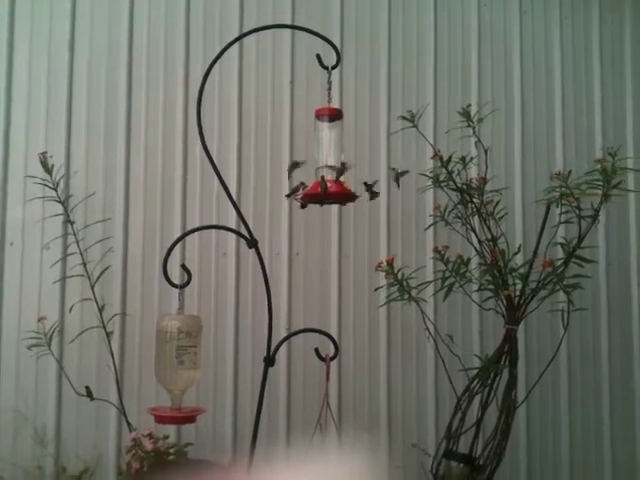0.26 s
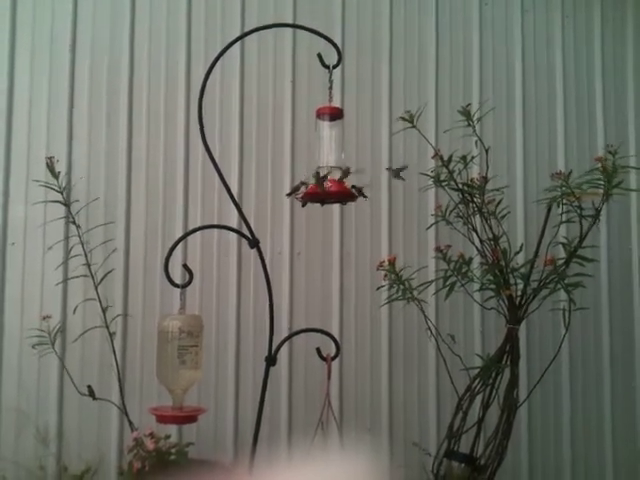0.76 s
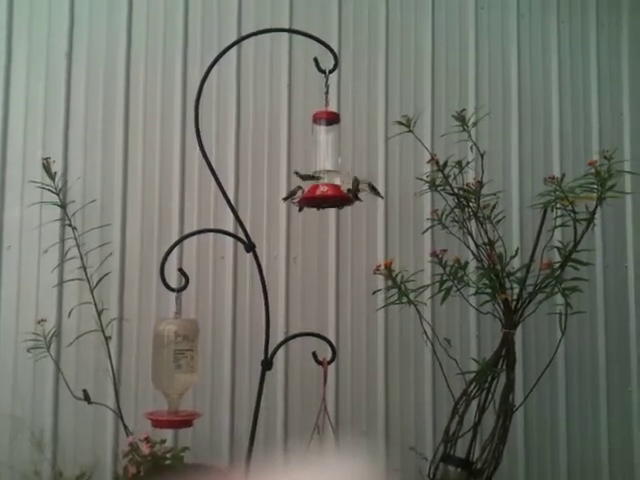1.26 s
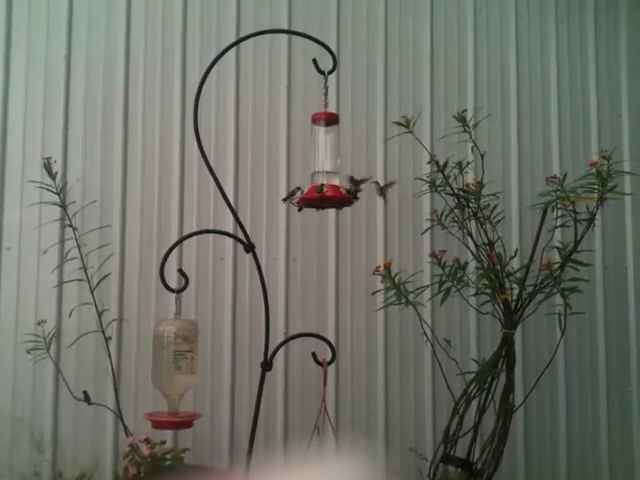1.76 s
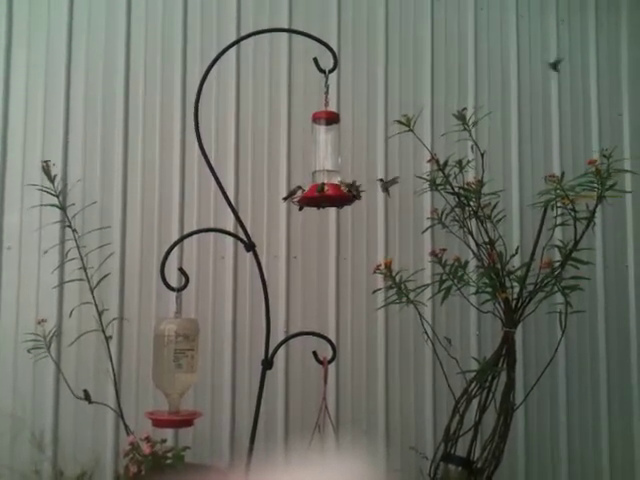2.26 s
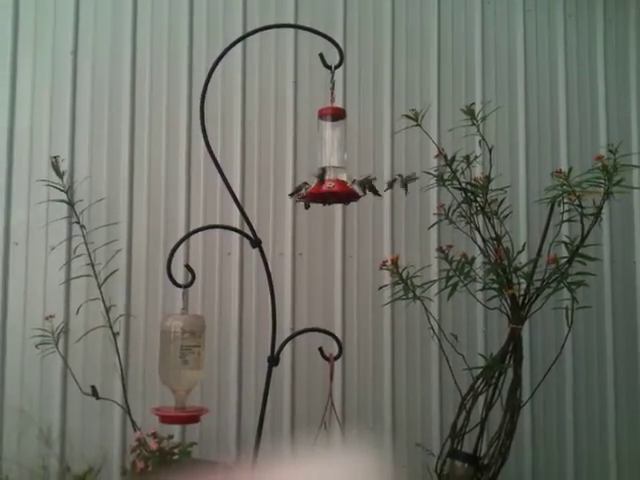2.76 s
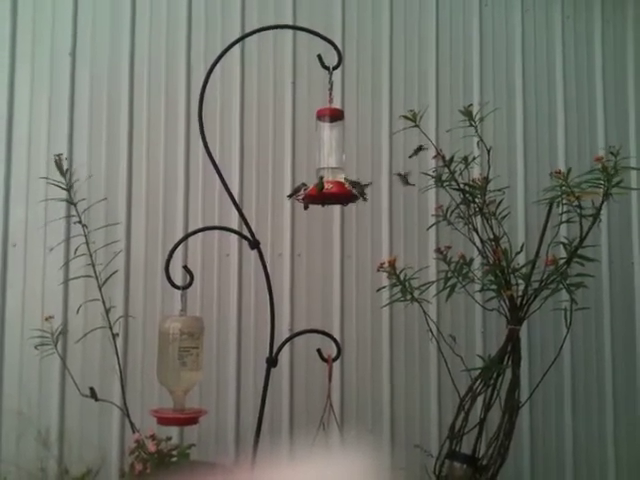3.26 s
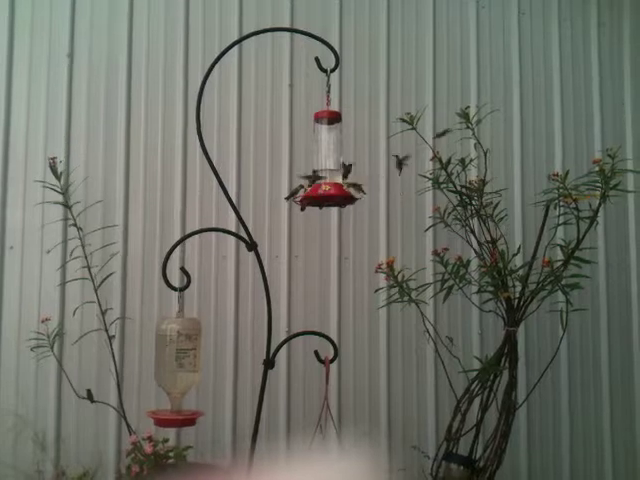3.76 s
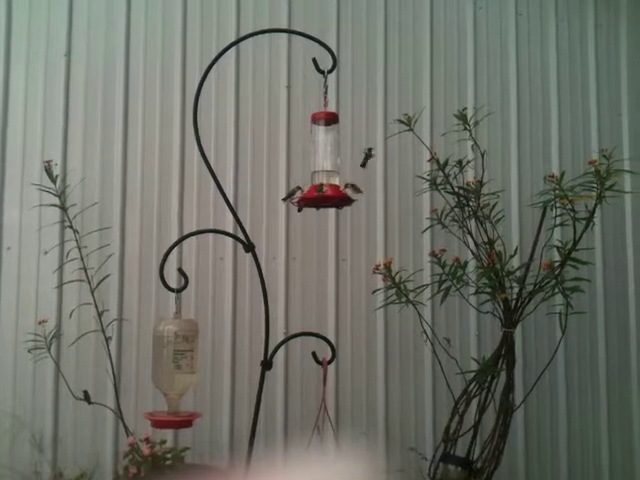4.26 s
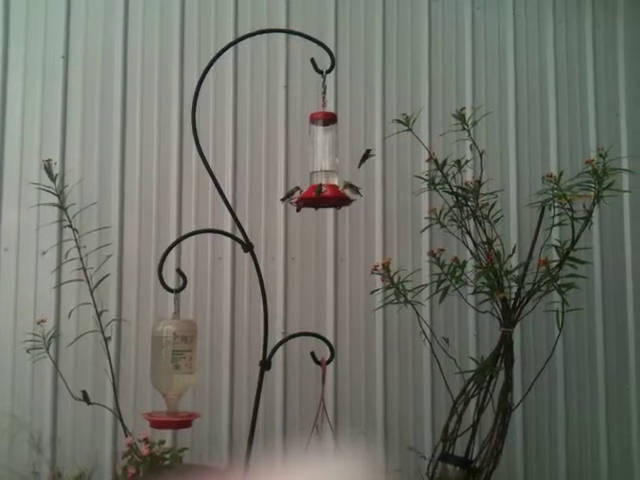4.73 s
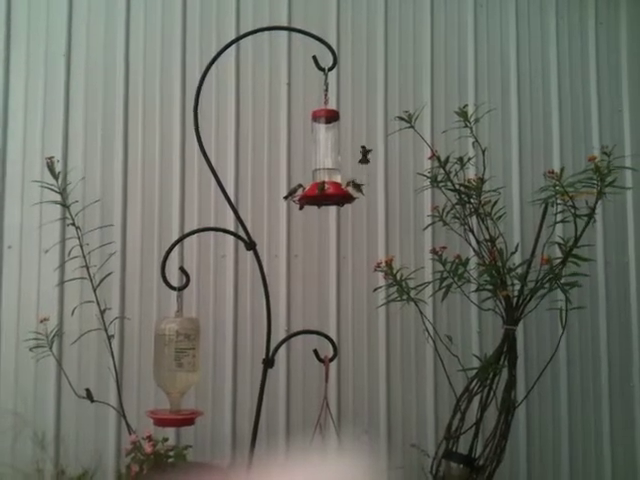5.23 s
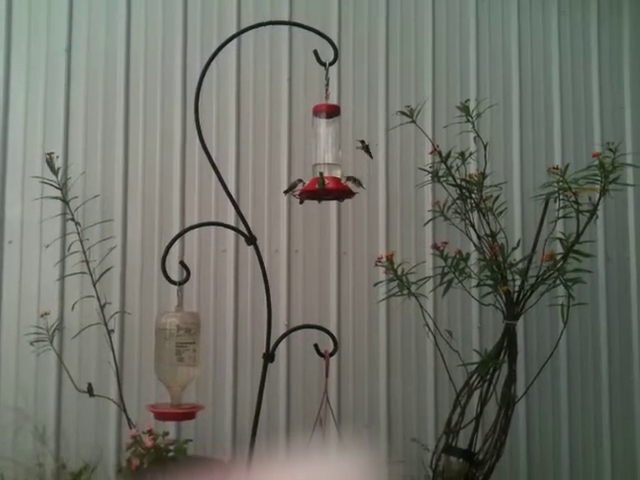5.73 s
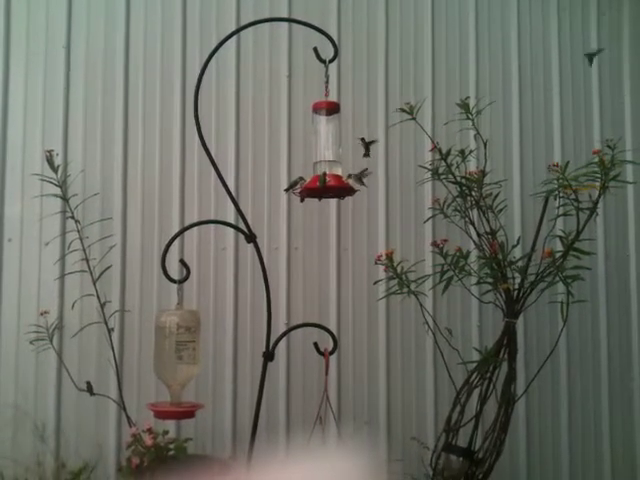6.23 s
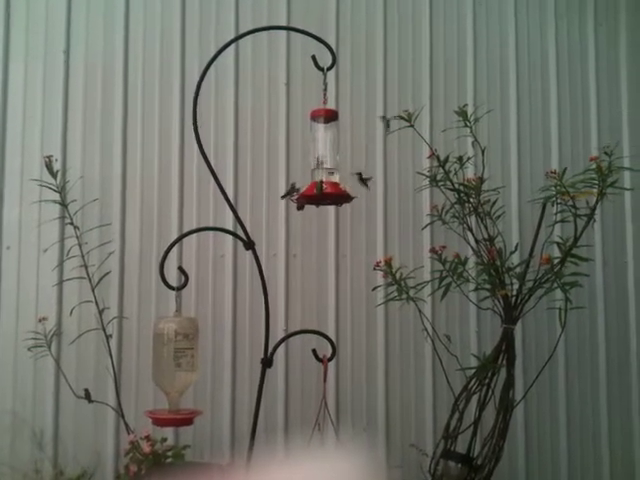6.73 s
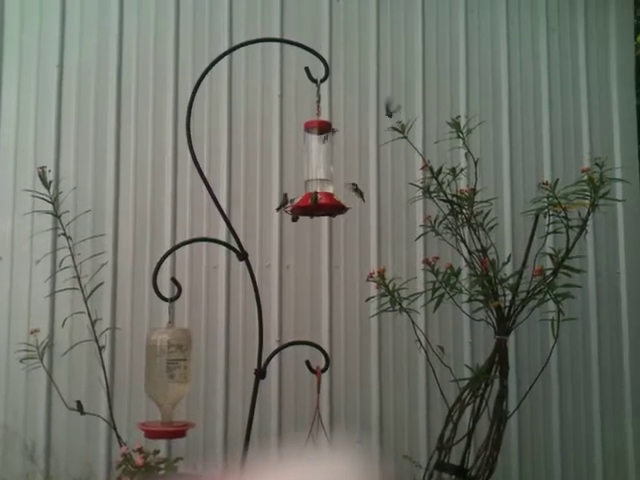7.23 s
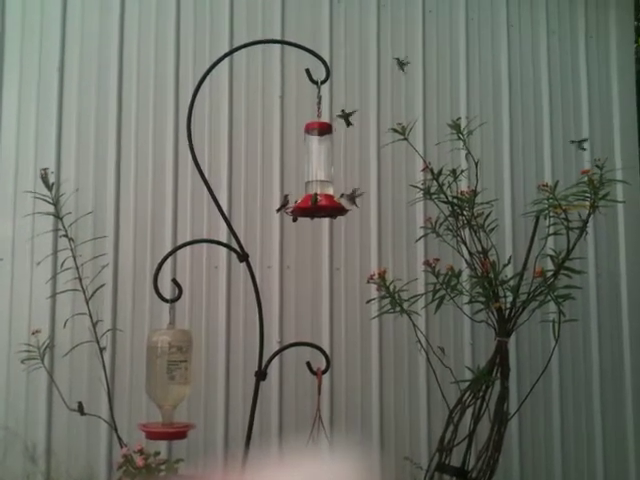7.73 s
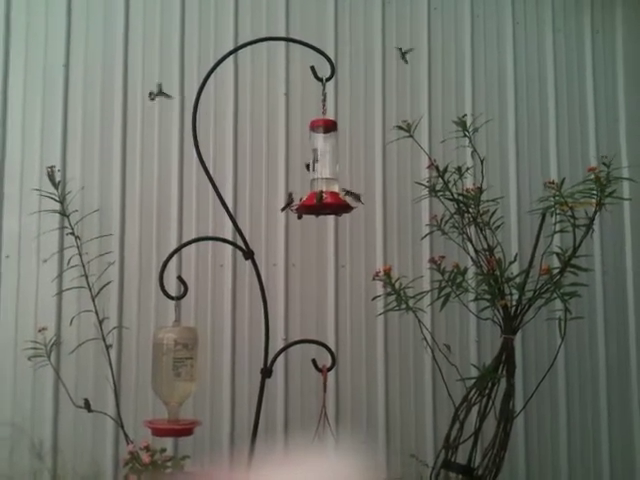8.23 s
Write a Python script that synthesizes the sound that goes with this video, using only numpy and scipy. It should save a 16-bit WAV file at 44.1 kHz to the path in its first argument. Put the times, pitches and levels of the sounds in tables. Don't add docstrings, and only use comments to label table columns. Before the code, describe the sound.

A steady air-conditioner hum and rush with soft wind thumps on the microphone, faint distant bird calls, then a hummingbird's quick high whistle, trills and buzzes.

```python
import sys
import numpy as np
from scipy import signal
from scipy.fft import rfft, irfft
from scipy.io import wavfile
from scipy.ndimage import uniform_filter1d, map_coordinates

SR = 44100
rng = np.random.default_rng(int(sys.argv[2]) if len(sys.argv) > 2 else 0)


def nominal_scale(level):
    x = np.asarray(level, float) / 20
    return 10 ** x


def file_out(sig):
    cols = np.atleast_2d(sig).T
    lim = np.clip(cols, -1, 1)
    pcm = np.round(lim * 32767).astype(np.int16)
    wavfile.write(sys.argv[1], SR, pcm)


N = 374397


def unit(x):
    return x / np.sqrt(np.mean(x ** 2) + 1e-20)


def along(points, hz):
    f, v = np.transpose(points)
    return np.interp(np.log(hz + 1), np.log(f + 1), v)


def curve(rows):
    return np.interp(np.arange(N) / SR, *np.transpose(rows))


def wobble(rate):
    knots = rng.standard_normal(int(N * rate / SR) + 4)
    return map_coordinates(knots, [np.arange(N) * rate / SR])


def add(track, s, sound):
    part = track[max(round(s * SR), 0):][:len(sound)]
    part += sound[:len(part)]


def sing(pitch_hz):
    return np.sin(2 * np.pi * np.cumsum(pitch_hz) / SR)


def rush(spectrum, patchy_db):
    z = signal.stft(rng.standard_normal(N + 8192), nperseg=512)[2]
    field = uniform_filter1d(rng.standard_normal(z.shape), 6, 0)
    field = uniform_filter1d(field, 14, 1)
    x = signal.istft(z * nominal_scale(patchy_db * unit(field)), nperseg=512)[1]
    colour = nominal_scale(along(spectrum, np.fft.rfftfreq(len(x), 1 / SR)))
    return unit(irfft(rfft(x) * colour, len(x))[:N])


def band(count, hz, width_hz):
    away = (np.fft.rfftfreq(count, 1 / SR) - hz) / width_hz
    bell = np.exp(-.5 * away ** 2 - .1 * away ** 6)
    return unit(irfft(rfft(rng.standard_normal(count)) * bell, count))


def air():
    # [Hz, dB per Hz]
    fan_colour = [(150, -25), (250, -6.5), (284, -6), (426, -7), (452, -5.5), (479, -7.5), (507, -7.5),
                  (538, -13), (647, -18.5), (875, -17), (1230, -22), (2140, -28.5), (4000, -39.5),
                  (5200, -54), (8800, -120)]
    # [Hz, dB per Hz]
    hiss_colour = [(1470, -62), (2500, 0), (3320, -4.5), (3580, 0), (4580, -1), (5540, 1), (7080, 0),
                   (7640, -3), (10200, -5), (11900, -13.5), (13200, -14), (15600, -17)]
    # [Hz, dB per Hz]
    shimmer_colour = [(6180, -21), (10500, 6), (11600, 10), (13100, 15), (14500, 8), (15600, 3)]
    # [s, s, dB]
    choruses = [
        (.4, 2.55, -62.5),
        (4.95, 5.7, -66),
        (6.4, 8.6, -63),
    ]
    fade_s, lull_db = .2, -73

    fan = nominal_scale(-40) * rush(fan_colour, patchy_db=0.9)
    hiss = nominal_scale(-51 + 0.24 * wobble(2.83)) * rush(hiss_colour, patchy_db=0.94)
    t = np.arange(N) / SR
    strength = nominal_scale(lull_db)
    for start_s, end_s, db in choruses:
        inside_s = np.minimum(t - start_s, end_s - t)
        strength = strength + nominal_scale(db) * np.clip(inside_s / fade_s / 2 + .5, 0, 1)
    insects = strength * nominal_scale(1.2 * wobble(2.52) - 2.5) * rush(shimmer_colour, patchy_db=.5)
    return fan + hiss + insects


def comb(order, level_db, turn_hz):
    turn = np.arange(1024) / 1024
    cycles = []
    for _ in range(3):
        start = rng.random((len(order), 1))
        cycles.append(nominal_scale(level_db + 3) @ np.sin(2 * np.pi * (order[:, None] * turn + start)))
    angle = turn_hz * np.arange(N) / SR + .0004 * wobble(6)
    at = angle % 1 * len(turn)
    direct, *side = [map_coordinates(c, [at], mode="grid-wrap") for c in cycles]
    return direct + 0.27 * sum(path * wobble(5) for path in side)


def compressor():
    # [Hz, dB rms]
    mains = [
        (119.95, -55.5),
        (239.9, -45.5),
        (359.85, -78),
        (479.8, -36.5),
    ]
    # [times the shaft rate, dB rms]
    strongest = [(15, -57), (17, -56.5), (18, -66), (21, -60.5), (23, -61.5), (44, -72), (48, -76),
                 (60, -71.5), (61, -69.5), (62, -89), (67, -74.5), (83, -69), (85, -78), (92, -67.5),
                 (101, -69.5), (104, -70), (109, -82), (110, -70), (112, -80), (115, -69.5), (116, -93.5),
                 (117, -73), (119, -70), (124, -75.5), (143, -77), (145, -87.5), (148, -92), (151, -87),
                 (153, -84), (160, -84)]
    # [Hz, dB rms]
    shell = [(1700, -79), (2500, -81), (4500, -84.5), (6000, -80), (8000, -86), (11000, -84)]
    # [times its rate, dB rms]
    rotor = [(9, -62), (10, -67.5), (12, -76), (13, -68), (14, -62.5), (15, -58.5), (16, -63.5), (17, -62),
             (18, -62), (19, -67), (20, -67.5), (21, -60.5), (23, -62.5), (24, -76), (25, -74.5),
             (31, -69.5)]
    shaft_hz, rotor_hz = 58.837, 59.02

    t = np.arange(N) / SR
    hum = np.zeros(N)
    for hz, db in mains:
        hum += nominal_scale(db + 2.5 + 0.82 * wobble(14)) * np.sin(2 * np.pi * hz * t + 0.04 * wobble(11))
    order = np.arange(28, 190)
    level_db = along(shell, order * shaft_hz) + 3.5 * rng.standard_normal(len(order))
    for multiple, db in strongest:
        level_db[order == multiple] = db
    rotor_order, rotor_db = np.transpose(rotor)
    return hum + comb(order, level_db, shaft_hz) + comb(rotor_order, rotor_db, rotor_hz)


def breeze():
    # [Hz, dB per Hz]
    buffet = [(12, -63), (20, -26), (37, -48), (54, -25.5), (131, 3), (232, 1.5), (282, -8.5), (338, -1.5),
              (433, -7), (450, -22.5), (580, -35), (990, -120)]
    # [s, dB]
    strength = [(0.0, -35), (0.28, -38), (0.83, -34), (1.23, -42.5), (1.98, -36.5), (2.62, -42.5),
                (2.88, -36), (3.24, -38.5), (3.43, -37.5), (5.7, -38), (5.96, -39), (6.29, -37),
                (6.81, -39.5), (7.28, -36), (7.61, -38), (8.49, -38.5)]
    # [s, dB, ms]
    thumps = [(0.054, -19.5, 7.4), (0.711, -22, 11), (0.735, -13.5, 7.8), (0.765, -16.5, 2.3),
              (0.796, -14, 9.4), (1.007, -23, 10), (1.468, -20, 7.9), (1.947, -21.5, 5), (1.999, -23, 6.2),
              (3.009, -26, 9.5), (3.272, -22, 6.3), (3.733, -23, 10), (4.204, -21, 9.7), (4.301, -19, 5.2),
              (4.92, -22, 14), (5.04, -23.5, 11), (5.211, -18.5, 13.6), (5.669, -16, 9), (5.763, -21, 8.8),
              (6.205, -23.5, 14), (6.447, -20, 5), (6.467, -17.5, 3.7), (6.495, -21.5, 12),
              (6.955, -18.5, 8), (7.053, -14, 9), (7.14, -17.5, 9), (7.194, -20, 5.9), (7.231, -22, 5.4),
              (7.61, -22, 14), (7.984, -21, 7.7)]
    eddy_hz, wide_drop_hz_per_ms, scatter_hz = 225.8, 3.26, 11
    wakes_each, trail_s = 2, .028
    wake_db, wake_share, wake_ms = -17, 0.42, 6.8

    out = nominal_scale(curve(strength)) * unit(nominal_scale(1.8 * wobble(40)) * rush(buffet, patchy_db=0.65))
    eddies = list(thumps)
    for s, db, _ in thumps:
        for late, size, width in rng.random((wakes_each, 3)):
            small_db = wake_db + wake_share * db + 5 * (size - .5)
            eddies.append((s + .012 + trail_s * late, small_db, wake_ms * (0.54 + width)))
    t = np.arange(-1200, 1200) / SR
    for s, db, ms in eddies:
        phase, stray = rng.random(2)
        hz = eddy_hz - wide_drop_hz_per_ms * ms + scatter_hz * (4 * stray - 2)
        push = nominal_scale(-24 * (t / ms * 1000) ** 2) * np.sin(2 * np.pi * (hz * t + phase))
        edge = nominal_scale(-24 * ((t + 0.0032) / 0.002) ** 2) * np.sin(2 * np.pi * (2.9 * hz * t + phase))
        add(out, max(s, .046) + t[0], nominal_scale(db - 1) * (push + nominal_scale(.5 * db - 6.5) * edge))
    return out


def rasps(calls):
    out = np.zeros(N)
    warble, flutter = np.tanh(wobble(420)), wobble(600)
    for s, ms, hz, depth_hz, db in calls:
        u = np.linspace(0, 1, round(ms * SR / 1000))
        at = round(s * SR)
        tone = sing(hz + depth_hz * warble[at:][:len(u)])
        noise = band(8192, hz, 1.18 * depth_hz)[:len(u)]
        shape = np.sin(np.pi * u ** .7) ** .7
        add(out, s, nominal_scale(db + 1.5 * flutter[at:][:len(u)]) * shape * (.6 * tone + 1.1 * noise))
    return out


def glides(calls):
    out = np.zeros(N)
    flutter = wobble(600)
    for s, ms, from_hz, to_hz, db in calls:
        u = np.linspace(0, 1, round(ms * SR / 1000))
        level_db = db - 3.7 * u + 2.7 * flutter[round(s * SR):][:len(u)]
        tone = sing(from_hz + (to_hz - from_hz) * u)
        add(out, s, nominal_scale(level_db) * np.sin(np.pi * u ** 0.82) * tone)
    return out


def far_birds():
    # [s, ms, Hz, dB]
    calls = [(.31, 20, 6000, -60), (1.33, 20, 5700, -54), (1.56, 15, 6000, -53), (1.675, 18, 5900, -52),
             (1.705, 15, 6000, -58), (2.40, 56, 6200, -54), (2.71, 14, 5940, -54), (2.87, 70, 6400, -55),
             (3.07, 30, 6300, -53), (6.16, 15, 6800, -55)]
    # [s, ms, Hz, Hz, dB]
    whistles = [
        (2.288, 55, 6080, 5700, -47),
        (2.872, 75, 5750, 5400, -51),
    ]
    depth_hz, depth_hz_per_ms = 650, 9
    return rasps([(s, ms, hz, depth_hz + depth_hz_per_ms * ms, db) for s, ms, hz, db in calls]) + glides(whistles)


def bill_snap():
    # [s, Hz, dB]
    snap_s, snap_hz, snap_db = (7.0052, 11500, -27)
    out = np.zeros(N)
    t = np.arange(-60, 60) / SR
    add(out, snap_s + t[0], nominal_scale(snap_db - 3.5 * (t / .0001) ** 2) * np.cos(2 * np.pi * snap_hz * t))
    return out


def chips():
    # [s, dB]
    notes_sung = [
        (5.129, -40.5),
        (5.193, -43),
        (5.533, -40.5),
        (5.602, -43),
        (5.679, -44.5),
    ]
    # [s, dB]
    cracks = [
        (4.798, -45),
    ]
    # [ms, ms, Hz, Hz, dB]
    late_ms, rasp_ms, rasp_hz, depth_hz, rasp_db = (7.5, 18, 7750, 2000, -6)
    chip_ms, from_hz, to_hz = 13, 6850, 5100
    falls = glides([(s, chip_ms, from_hz, to_hz, db) for s, db in notes_sung])
    harsh = [(s + late_ms / 1000, rasp_ms, rasp_hz, depth_hz, db + rasp_db) for s, db in notes_sung + cracks]
    return falls + rasps(harsh)


def buzzes():
    # [s, ms, dB]
    calls = [
        (5.021, 54, -42),
        (5.428, 58, -43.5),
    ]
    # [Hz, Hz, dB, part of the length]
    bands = [(7620, 2100, -1, 1.01), (7900, 790, -4.5, .8), (4900, 1100, -7.5, .6), (12000, 2200, -16, .8)]
    return rasps([(s, ms * share, hz, depth_hz, db + band_db)
                  for s, ms, db in calls for hz, depth_hz, band_db, share in bands])


def trill():
    # [s, ms, Hz, dB, dB]
    trills = [
        (4.871, 12.8, 6950, -32.5, -48.5),
        (5.2705, 13.8, 6780, -31, -49.5),
    ]
    # [Hz, Hz, dB]
    bands = [(5950, 850, -2), (8300, 1600, -1), (12000, 1900, -7)]
    beats, sag_hz_per_s, scoop_hz, scoop_ms = 7, 4000, 1800, 2.3
    edge_db, dip_db, peak_at = 14.5, 7.5, .43

    out = np.zeros(N)
    harsh = []
    for s, beat_ms, hz, db, rasp_db in trills:
        ms = np.arange(round(beats * beat_ms * SR / 1000)) * 1000 / SR
        u = ms / ms[-1]
        since = ms % beat_ms
        scoop = scoop_hz * np.exp(-(since / scoop_ms) ** 2)
        pitch_hz = hz - sag_hz_per_s * ms / 1000 - scoop + 110 * wobble(400)[:len(ms)]
        swell_db = -edge_db * ((u - peak_at) / 0.42) ** 2
        beat_db = -dip_db * np.cos(np.pi * (since / beat_ms - .05)) ** 2
        level_db = db + swell_db + beat_db + 2.5 * wobble(450)[:len(ms)]
        gate = np.clip(np.minimum(since, beat_ms - since) / 0.86, 0, 1)
        add(out, s, nominal_scale(level_db) * gate * sing(pitch_hz))
        for centre_hz, depth_hz, band_db in bands:
            harsh.append((s + beat_ms / 1000, (beats - 1.2) * beat_ms, centre_hz, depth_hz, rasp_db + band_db))
    return out + rasps(harsh)


def whistle():
    # [s, Hz, dB]
    s, hz, db = np.transpose([
        (4.726, 5800, -60),
        (4.735, 6950, -36),
        (4.748, 7130, -49),
        (4.766, 7120, -29),
        (4.775, 7030, -35),
        (4.786, 6940, -24),
        (4.803, 6900, -45),
        (4.813, 6780, -32),
        (4.826, 6950, -48),
    ])
    t = np.arange(s[0], s[-1], 1 / SR)
    phase = 2 * np.pi * np.cumsum(np.interp(t, s, hz)) / SR
    breath = nominal_scale(np.interp(t, s, db) + .8 * wobble(250)[:len(t)])
    octave_on = (t > 4.74) * (t < 4.812)
    octave = nominal_scale(-34 + 2 * wobble(300)[:len(t)]) * breath ** 0.51 * octave_on * np.sin(2 * phase)
    out = np.zeros(N)
    add(out, s[0], breath * np.sin(phase) + octave)
    return out


def yard(x):
    # [Hz, s to fall 60 dB]
    decay = [(3000, 0.34), (7000, 0.25), (14000, .1)]
    hz, t, z = signal.stft(rng.standard_normal(SR // 3), SR, nperseg=256)
    tail = signal.istft(z * nominal_scale(-60 * t / along(decay, hz)[:, None]), SR, nperseg=256)[1]
    late = np.pad(x, (150, 0))
    return signal.fftconvolve(late, tail / np.linalg.norm(tail))[:N]


def scene():
    birds = whistle() + trill() + buzzes() + chips() + bill_snap() + far_birds()
    echo = nominal_scale(-8) * yard(birds)
    return (birds + echo + compressor() + air() + breeze())[None]


def dropouts(x):
    # [Hz, sigma]
    spared = [(9000, 3.6), (11500, 1.9), (14000, 1.4), (15700, .6)]
    hz, _, z = signal.stft(x, SR, nperseg=1024, noverlap=768)
    chance = uniform_filter1d(rng.standard_normal(z.shape), 10, 1)
    chance = unit(uniform_filter1d(chance, 5, 0))
    loudest = np.abs(z[hz > 5000]).max(axis=0)
    masked = (np.abs(z) < nominal_scale(-38) * loudest) & (hz[:, None] > 10500)
    lost = masked | (chance > along(spared, hz)[:, None])
    return signal.istft(np.where(lost, nominal_scale(-30), 1) * z, SR, nperseg=1024, noverlap=768)[1][:N]


def band_limit(x):
    return signal.sosfilt(signal.butter(12, 15780, fs=SR, output="sos"), x)


def record(dry):
    top_hz, bass_hz = 15750, 62
    hz = np.fft.rfftfreq(N, 1 / SR)
    response = (hz < top_hz) / np.sqrt(1 + (bass_hz / (hz + 1)) ** 4)
    kept = irfft(rfft(dry) * response, N)
    mix = dropouts(kept[0])[None]
    return band_limit(mix)


dry = scene()
out = record(dry)
file_out(out)
```